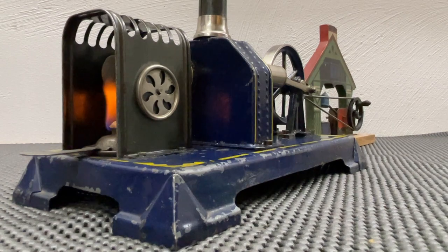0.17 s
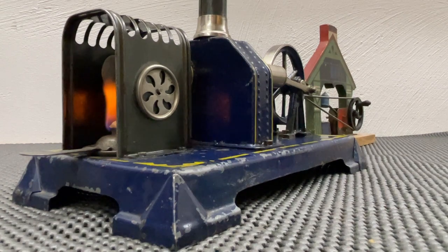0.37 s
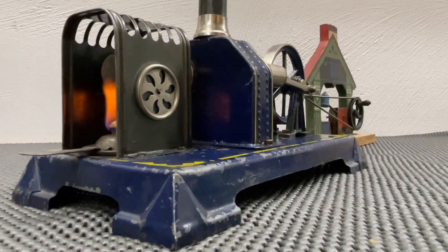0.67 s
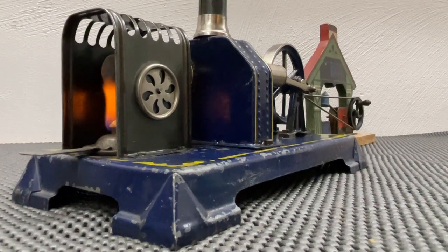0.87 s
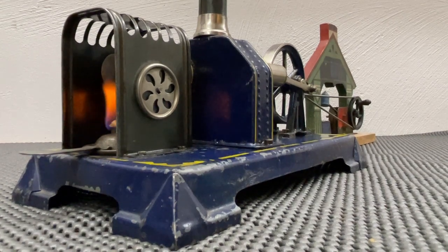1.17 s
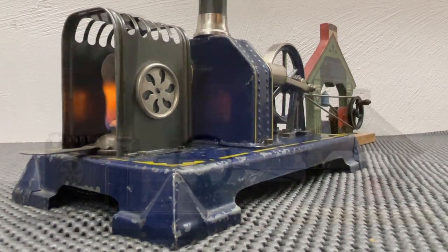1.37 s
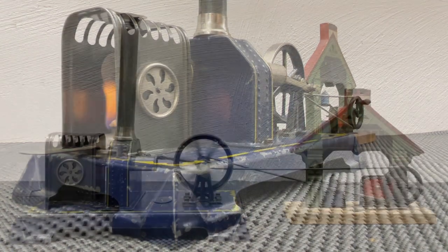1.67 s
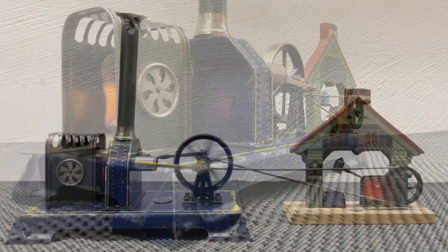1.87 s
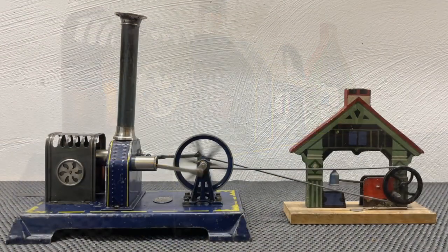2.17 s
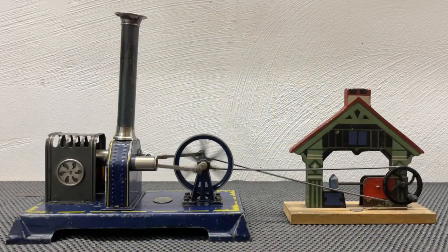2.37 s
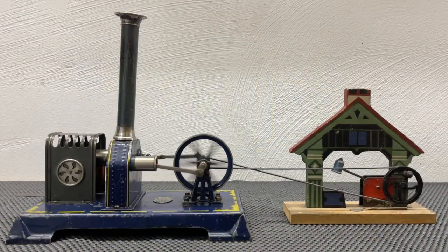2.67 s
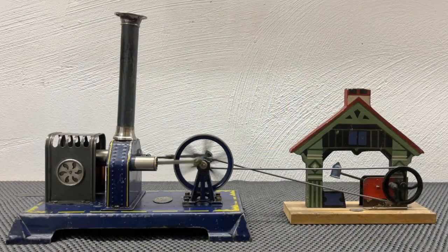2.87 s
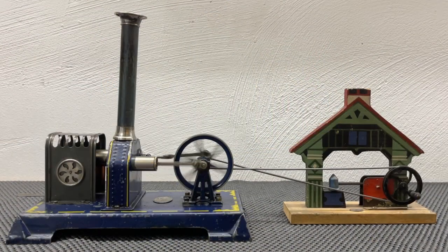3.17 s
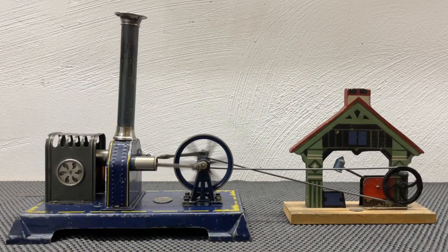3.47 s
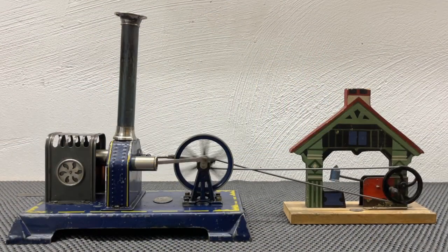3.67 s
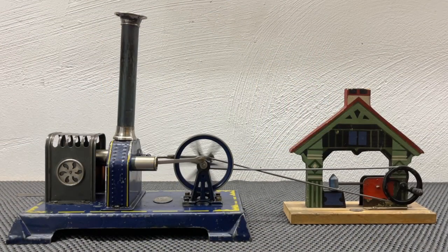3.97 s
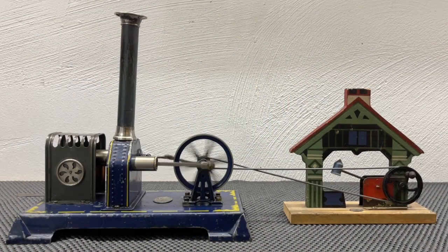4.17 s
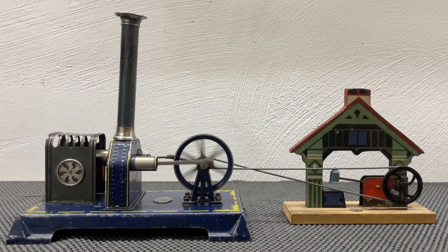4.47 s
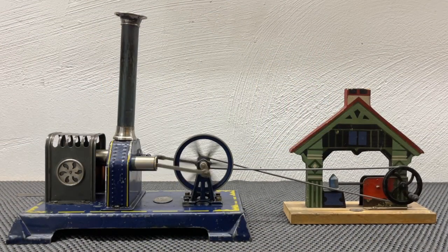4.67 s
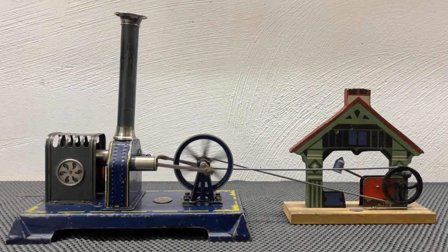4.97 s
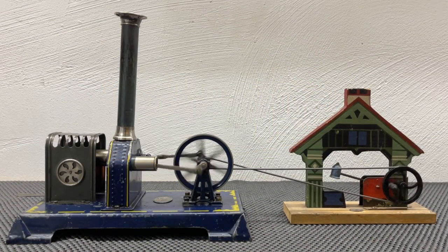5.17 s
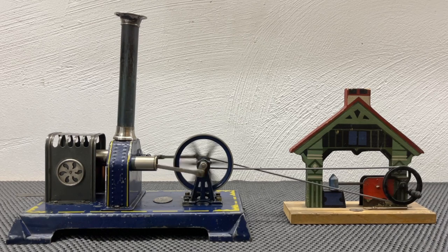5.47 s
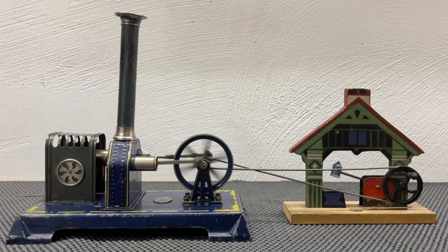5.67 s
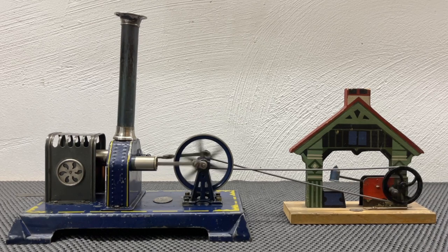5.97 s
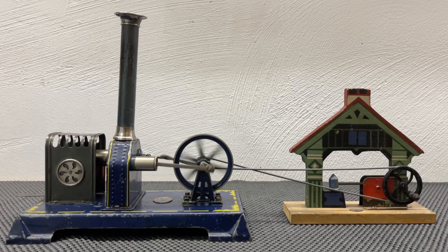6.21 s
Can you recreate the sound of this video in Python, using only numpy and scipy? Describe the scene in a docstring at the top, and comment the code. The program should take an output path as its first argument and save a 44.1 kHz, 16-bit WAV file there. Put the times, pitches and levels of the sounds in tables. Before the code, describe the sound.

A small flame hisses and flutters quietly, then fades into a toy engine's fast even metallic clatter, with a toy mill's hammer knocking regularly.

```python
"""A spirit flame is heard first, hissing and fluttering close by: bands of flickering noise with soft, dull puffs.
It fades over into a running tin toy hot-air engine on a table indoors, knocking twice a turn as its linkage
takes up play: each contact excites decaying modes of base plate, cylinder and linkage. Periodic pushes keep the
table humming, bearings and belt add noise, and a belt-driven toy mill to the right has a cam that lifts, rattles
and drops a small hammer, again modal, with rebounds. Feedback delays supply the room's reverberation."""
import sys
import numpy as np
from scipy import signal
from scipy.fft import rfft, irfft, next_fast_len
from scipy.io import wavfile

SR = 44100
rng = np.random.default_rng(int(sys.argv[2]) if len(sys.argv) > 2 else 0)


def put_to_file(sound):
    """Save the sound as 16-bit audio at rate SR, in the file named by the first command-line argument."""
    columns = np.atleast_2d(sound).T  # one column per channel
    safe = np.clip(columns, -1, 1)
    whole_steps = np.round(safe * 32767)
    wavfile.write(sys.argv[1], SR, whole_steps.astype(np.int16))


def volts_from_decibels(level):
    """Turn decibel levels (scalar or array-like) into linear amplitude factors."""
    exponent = np.asarray(level, float) / 20
    return 10 ** exponent


N = 279594


def rms_one(x):
    """Normalisation: scale a signal to unit root mean square."""
    return x / np.sqrt(np.mean(x ** 2) + 1e-20)


def in_time(rows):
    """Linear interpolation: a two-column curve read at every sample."""
    return np.interp(np.arange(N) / SR, *np.transpose(rows))


def at_hz(points, hz):
    """Interpolation on a logarithmic frequency axis."""
    points_hz, values = np.array(points).T
    return np.interp(np.log(hz), np.log(points_hz + 1), values)


def drift(rate_hz):
    """Low-pass filtered chance: a random fluctuation of spread 1, weaker above its corner rate."""
    step = 40   # samples between computed points
    r = np.exp(-2 * np.pi * rate_hz * step / SR)
    noise = rng.standard_normal(N // step + 2002)
    slow = signal.lfilter([1], [1, -2 * r, r * r], noise)[2000:]   # drop the filter's start
    return np.interp(np.arange(N) / step, np.arange(len(slow)), rms_one(slow))


def clicks(s, size):
    """Impulsive excitation: single-sample impulses of given sizes at given times."""
    at = np.round(np.ravel(s) * SR).astype(int)
    return np.bincount(at, np.ravel(size), N)[:N] + 1e-18


def ring(x, hz, t60):
    """Damped resonance: a unit click sets ringing a sine of initial height 1 that falls 60 dB in t60 seconds."""
    r, w = volts_from_decibels(-60 / (t60 * SR)), 2 * np.pi * hz / SR
    return signal.lfilter([0, np.sin(w)], [1, -2 * r * np.cos(w), r * r], x)


def struck(modes, s, db, spread_db, tilt_db=0):
    """Modal superposition: each blow excites every mode, with chance in level; tilt is in dB per octave."""
    middle_hz = np.median(modes, axis=0)[0]
    out = 0
    for k, (hz, mode_db, t60) in enumerate(modes):
        chance_db = spread_db * rng.standard_normal(np.shape(s))
        blow_db = db + mode_db + tilt_db * np.log2(hz / middle_hz) + chance_db
        # neighbouring modes start in opposite directions
        out = out + (-1) ** k * ring(clicks(s, volts_from_decibels(blow_db)), hz, t60)
    return out


def coloured(x, spectrum):
    """Linear filtering: multiply the spectrum of a signal by a gain curve."""
    size = next_fast_len(N + 4096)
    hz = np.arange(size // 2 + 1) * SR / size
    return irfft(rfft(x, size) * volts_from_decibels(at_hz(spectrum, hz + 1)), size)[:, :N]


def banded_noise(spectrum, likeness, balance, patchy_db):
    """Partial coherence: third-octave stereo noise, each band with flicker, likeness and balance; rms 1."""
    out, together = 0, drift(60)
    edges = 25 * 2 ** (np.arange(28) / 3)
    white = rng.standard_normal((2, 2, N))
    for k, (low, high) in enumerate(zip(edges, edges[1:])):
        band = signal.butter(2, [low, high], "band", fs=SR, output="sos")
        mid, side = signal.sosfilt(band, white[k % 2])
        hz = np.sqrt(low * high)
        alike = np.clip(at_hz(likeness, hz), -1, 1)
        lean = at_hz(balance, hz) / 2
        flicker = volts_from_decibels(patchy_db * (together + 0.91 * drift(10.8)))
        pair = np.sqrt(1 + alike) * mid + np.sqrt(1 - alike) * side * [[1], [-1]]
        out = out + flicker * volts_from_decibels([[lean], [-lean]]) * pair
    return rms_one(coloured(out, spectrum))


def room(x):
    """Reverberation by recirculation: eight feedback delays a side, very slightly duller on every round."""
    t60_s, wall_cut_hz = 0.3, 180000
    size = next_fast_len(N + SR)
    hz = np.arange(size // 2 + 1) * SR / size
    lag_s = rng.uniform(0.009, 0.019, (2, 8, 1))
    loop = volts_from_decibels(-60 * lag_s / t60_s) / (1 + 1j * hz / wall_cut_hz) * np.exp(-2j * np.pi * hz * lag_s)
    signs = (-1) ** np.arange(8)[:, None]
    response = (signs * loop / (1 - loop)).sum(axis=1)
    return irfft(rfft(x, size) * response, size)[:, :N]


# Level difference of the two microphone ports: f/Hz, left over right level/dB
PORT_DB = [(60, 2), (170, -1), (500, 1.5), (1460, 3.5), (4220, 5), (12200, 1)]
# Phase difference of the ports: f/Hz, lead of the left phase/rad
PORT_LEAD = [(0, 0), (780, 0.6), (1810, 0.1), (3270, 1.0), (3960, 0.4), (6120, 0.5), (6800, -0.0),
             (7240, 1.0), (7670, 1.0), (8790, -0.3), (9820, -2.8), (10900, -3.5), (11600, -6.3),
             (12400, -6.3)]


def ports(x):
    """Interchannel level and phase: two microphone ports share the direct sound's differences equally."""
    size = next_fast_len(N + 4096)
    hz = np.arange(size // 2 + 1) * SR / size
    phase = 0.5 * np.interp(hz, *np.transpose(PORT_LEAD))
    half = volts_from_decibels(at_hz(PORT_DB, hz + 1) / 2) * np.exp(1j * phase)
    return irfft(rfft(x, size) * [half, 1 / half], size)[:, :N]


# Noise of bearings and belt: f/Hz, relative spectral level/dB
RUNNING = [(40, -42), (55, -4.5), (283, -19), (530, -14.5), (650, -11), (890, -6.5), (1150, -10),
           (1430, -2.5), (1970, -11), (4660, -18), (9500, -19.5), (10300, -25.5), (12500, -59)]
# Its likeness between left and right: f/Hz, correlation/1
RUNNING_LIKENESS = [(60, 0.9), (170, 0.84), (500, 0.68), (1460, 0.21), (4220, 0.31), (12200, 0.28)]


def running_noise():
    """Broadband friction noise: bearings and belt as flickering bands of partly coherent noise."""
    return volts_from_decibels(-53) * banded_noise(RUNNING, RUNNING_LIKENESS, PORT_DB, patchy_db=3.0)


def table(out_s):
    """Periodically forced resonance: one push of the unbalanced flywheel a turn keeps the table top humming."""
    mode_hz, t60_s, after_s = 44.76, 3.3, 0.019
    s = out_s + after_s
    turn_s = s[1] - s[0]
    s = np.r_[s[0] - turn_s * np.arange(9, 0, -1), s]   # it was turning before it is heard
    pushes = clicks(s, volts_from_decibels(1.0 * rng.standard_normal(len(s))))
    hum = signal.lfilter([0.01], [1, -0.99], ring(pushes, mode_hz, t60_s))   # low-pass
    return volts_from_decibels(-62) * rms_one(hum)


# Course of the flame's hiss: t/s, relative level/dB
FLAME_LEVEL = [(0.0, -64.5), (0.164, -65.5), (0.658, -64.5), (1.038, -66.5), (1.45, -65)]
# Colour of the hiss: f/Hz, relative level/dB
FLAME_HISS = [(30, 2), (90, 1), (200, -7), (540, -7), (990, -5.5), (1300, -7.5), (1900, 0), (2450, -2),
              (3500, -16), (4600, -11.5), (6700, -20.5), (7900, -13), (8650, 6), (9500, -12.5),
              (11000, -3.5), (12600, 4)]
# Likeness of left and right: f/Hz, correlation/1
FLAME_LIKENESS = [(60, 0.53), (170, 0.54), (500, 0.68), (1460, 0.18), (4220, 0.046), (12200, 0.31)]
# Balance of the hiss: f/Hz, left over right level/dB
FLAME_BALANCE = [(60, 1), (170, -1), (500, 4), (1460, 5), (4220, 9.5), (12200, -1.5)]
# Soft puffs of the flame: t/s, relative level/dB, f/Hz
PUFFS = [(0.118, -60.5, 980), (0.244, -59, 794), (0.359, -63, 549), (0.658, -60, 428), (0.75, -52, 570),
         (0.884, -57, 940), (0.992, -59, 996), (1.219, -61, 477), (1.289, -66, 630)]


def flame():
    """Modulated noise and damped bursts: a fluttering hiss with soft puffs."""
    noise = banded_noise(FLAME_HISS, FLAME_LIKENESS, FLAME_BALANCE, patchy_db=1.5)
    out = volts_from_decibels(in_time(FLAME_LEVEL) + 5.5) * noise
    for s, db, hz in PUFFS:
        later_s = 0.00447 * rng.exponential(1, 8)   # a puff is eight clicks close together
        out = out + ring(clicks(s + later_s, np.full(8, volts_from_decibels(db - 6.5))), hz, 0.011)
    return out


# The cam catches the hammer arm, seats and drags it up, the pivot squeaking:
# t/s, relative catch level/dB, seat level/dB, squeak level/dB
CATCHES = [(1.746, -30, -38, -52), (2.519, -28.5, -31.5, -49.5), (3.2826, -30.5, -40, -79),
           (4.0443, -28, -33, -58), (4.815, -30.5, -37.5, -46.5), (5.5755, -28, -41, -51),
           (6.3344, -28.5, -40, -60)]
# Modes of the hammer arm: f/Hz, relative level/dB, t60/s
HAMMER_ARM = [(2260, 1, 0.029), (2427, 1, 0.024), (2637, 1.5, 0.027), (3000, -17, 0.022)]


def lifting():
    """Stick-slip friction: uneven clicks on the cam ring the hammer arm and shake the wooden stand."""
    lift_db, quiet_db, waver_db = -54, -74, 1.5   # while the arm is dragged up; at rest; chance
    rise_s, hold_s, fade_s = 0.13, 0.093, 0.32
    shape_s = np.cumsum([0, rise_s, hold_s, fade_s])
    shape_db = [quiet_db, lift_db, lift_db, quiet_db]
    t = np.arange(N) / SR
    lifts_db = np.max([np.interp(t - row[0], shape_s, shape_db) for row in CATCHES], axis=0)
    level = volts_from_decibels(lifts_db + waver_db * drift(5.5))
    s = rng.uniform(0, N / SR, 1100)
    click_db = 4.0 * np.minimum(rng.exponential(1, s.shape), 2.5)
    arm = rms_one(struck(HAMMER_ARM, s, click_db, spread_db=4.0))
    stand = rms_one(ring(rng.standard_normal(N), 108.9, 0.26))
    return level * (volts_from_decibels(-1.0) * arm + volts_from_decibels(-13.0) * stand)


# The hammer falls, the cam having tripped it just before: t/s, relative blow level/dB, trip level/dB
FALLS = [(1.4812, -24.5, -34), (2.257, -27.5, -30), (3.0182, -29.5, -32), (3.7778, -25.5, -35),
         (4.5505, -27.5, -29.5), (5.3138, -27.5, -34), (6.0737, -29.5, -41.5)]
# Kinds of mill blow: rebound relative level/dB, third rebound delay/ms, hardness/(dB per octave)
FALL = (-3, 8.0, -2.3)
TRIP = (-8, 7.5, 0.1)
CATCH = (-3, 8.0, -2)
SEAT = (-7.5, 9.1, -8)
# Rebounds of a blow: share of the third rebound's delay/1, relative level/dB
REBOUNDS = [(.4, -1.5), (0.699, -5.5), (1, -9.5), (1.4, -7.5), (1.699, -11)]
# Modes of the mill: f/Hz, relative level/dB, t60/s
MILL = [(1788, -2.5, 0.018), (2264, -1.5, 0.019), (2616, 2, 0.02), (3041, 1.5, 0.021), (3386, 1, 0.033),
        (3666, -6.5, 0.032), (5200, -16.5, 0.024)]


def mill():
    """Impact and rebound: blows excite the mill's modes, rebounds are brighter, and the pivot squeaks."""
    trip_ahead_s, seat_after_s, squeak_after_s, squeak_width_s = 0.1047, 0.07, 0.095, 0.044
    blows = []
    for s, db, trip_db in FALLS:
        blows += [(s, db, *FALL), (s - trip_ahead_s, trip_db, *TRIP)]
    for s, db, seat_db, _ in CATCHES:
        blows += [(s, db, *CATCH), (s + seat_after_s, seat_db, *SEAT)]
    s, db, rebound_db, delay_ms, tilt_db = np.transpose(blows)[:, :, None]
    share, fall_db = np.transpose(REBOUNDS)
    jitter_ms = 0.3 * rng.standard_normal((len(s), len(share)))
    later = s + (share * delay_ms + jitter_ms) / 1000
    out = struck(MILL, s, db - 11.0, spread_db=3.0, tilt_db=tilt_db)
    rebounds_db = db + rebound_db + fall_db - 11.0
    out += struck(MILL, later, rebounds_db, spread_db=5.5, tilt_db=tilt_db + 1.5)
    t = np.arange(N) / SR - squeak_after_s
    whistle = rms_one(ring(rng.standard_normal(N), 11200, 0.01))
    swell = sum(volts_from_decibels(db) * np.exp(-(2 * (t - s) / squeak_width_s - 1) ** 2) for s, _, _, db in CATCHES)
    return out + whistle * swell


# Modes of the linkage: f/Hz, relative level/dB, t60/s
LINKAGE = [(2120, -2, 0.014), (2437, -6, 0.026), (2756, -1.5, 0.013), (3166, 0, 0.014), (3510, -5, 0.02),
           (4020, -3.5, 0.018), (4260, -16.5, 0.14), (4370, -7, 0.038), (5083, -2, 0.0098),
           (5306, -4, 0.015), (5860, 1, 0.0086), (6160, -9, 0.035), (6610, -2.5, 0.013),
           (7244, -4.5, 0.025), (7750, -2.5, 0.019), (8250, -1.5, 0.014), (8840, -3.5, 0.015),
           (9150, 0.5, 0.012), (9860, 6.5, .012), (10950, -10, 0.0087)]


def loose_play():
    """Random impacts: loose pins tick at chance times all through the turn."""
    s = rng.uniform(0, N / SR, 1500)
    tick_db = -74.0 + 3.1 * np.minimum(rng.exponential(1, s.shape), 4)
    return struck(LINKAGE, s, tick_db, spread_db=5.0)


# Speed of the flywheel: t/s, rotation rate/(turns per s)
FLYWHEEL = [(1.4, 6.3789), (2, 6.3324), (3, 6.4221), (4, 6.3952), (6.4, 6.454)]
# Back strokes that meet the play early: t/s, looseness/1
LOOSE = [(2.749, 1.01), (3.528, 1.01), (3.684, 0.45), (4.153, 0.96), (4.62, 0.5), (5.4, 0.66), (5.867, 0.7)]
# What full looseness adds: knock level/dB, tick level/dB, slack level/dB
LOOSE_DB = (-3.5, -2.5, 8)


def strokes(first_turn, shared_db):
    """Rotation integrated to phase: time, knock, tick and slack of the strokes at one crank angle, one a turn."""
    # chance in, and steady change of, knock, tick and slack: the knocks firm up as the engine runs
    spread_db, warming_db_per_s = (0.71, 1.2, 0.9), (0.33, -0.35, 0.5)
    jitter_ms, loose_late_ms = 0.3, 0.7
    t = np.arange(N) / SR
    turns = np.cumsum(in_time(FLYWHEEL) * (t >= FLYWHEEL[0][0])) / SR
    s = np.interp(np.arange(first_turn, turns[-1]), turns, t)
    loose = sum(share * (abs(s - when) < 0.02) for when, share in LOOSE)
    chance = rng.standard_normal((len(s), 4))
    db = shared_db + np.outer(s - s.mean(), warming_db_per_s) + np.outer(loose, LOOSE_DB)
    db = db + chance[:, 1:] * spread_db
    late_ms = loose_late_ms * loose + jitter_ms * chance[:, 0]
    return np.c_[s + late_ms / 1000, db]


# Contacts within a back and an out stroke: t after the knock/ms, relative base plate level/dB,
# hardness/(dB per octave), cylinder level/dB, linkage level/dB, rub time/ms
BACK_CONTACTS = [(-20, -41, 3, -27, -2.5, 12), (-12, -11, 17.5, -24, 1.5, 1.2), (-6, -19, -5, -14, 7, 1.1),
                 (-1.72, -10, 0.5, -14, 1.5, 1.4), (0.5, -4.5, 9, 0.5, 0, 1.6)]
OUT_CONTACTS = [(-25, -6, -4, -9, -7, 3), (-16, -11, -6.5, -27, -16, 2), (-3.5, -11.5, 15, -20, 2, .9),
                (-0.43, -7, 18.5, -2.5, 2.5, 1.1), (1, -6, 15, -4, -5, 3.0), (5.5, -12, -5, -38, -9.5, 1.7)]
# Modes of base plate and cylinder: f/Hz, relative level/dB, t60/s
BASE_PLATE = [(162, -22.5, 0.054), (414, -18, 0.067), (639, -2.5, 0.035), (758, -4, 0.028),
              (892.5, -2, 0.029), (1045.4, -13, 0.11)]
CYLINDER = [(1354, -0.5, 0.017), (1547, 1, 0.021), (1272, -25, 0.11), (1460, -30.5, 0.18),
            (1603, -37, 0.26)]


def engine(back, out):
    """Modal response to multiple impacts: the contacts of each stroke play base plate, cylinder and linkage."""
    firebox_hz, firebox_width_hz = 1555, 1100   # the air that the cylinder sounds through
    base, cylinder, linkage = 0, 0, 0
    for rows, contacts in ((back, BACK_CONTACTS), (out, OUT_CONTACTS)):
        s, knock_db, tick_db, slack_db = np.transpose(rows)[:, :, None]
        ms, base_db, tilt_db, cylinder_db, linkage_db, rub_ms = np.transpose(contacts)
        early = ms < -5   # slack taken up ahead of the knock
        jitter_ms = 0.35 * early * rng.standard_normal((len(s), len(ms)))
        at = s + (ms + jitter_ms) / 1000
        db = knock_db + slack_db * early
        base = base + struck(BASE_PLATE, at, db + base_db - 7.0, spread_db=1.46, tilt_db=tilt_db)
        # metal chatters on metal: a contact is a run of tiny touches thinning out over the rub time
        touches = at[:, :, None] + rub_ms[:, None] / 1000 * rng.exponential(1, at.shape + (6,))
        # slack is taken up in three nudges; the later contacts strike the cylinder at one instant
        nudges = np.where(early[:, None], touches, at[:, :, None])[:, :, :3]
        # two close modes start in opposition: the knock swells, then cancels
        nudge_db = (db + cylinder_db + 3.8 * early)[:, :, None] - 9.5
        cylinder = cylinder + struck(CYLINDER, nudges, nudge_db, spread_db=2.0)
        touch_db = (db + tick_db + linkage_db)[:, :, None] - 13.5
        linkage = linkage + struck(LINKAGE, touches, touch_db, spread_db=4.0)
    edges = firebox_hz + np.array([-0.5, 0.5]) * firebox_width_hz
    return base + linkage + signal.lfilter(*signal.butter(1, edges, "band", fs=SR), cylinder)


# What every stroke of a kind shares: relative knock level/dB, tick level over the knock/dB,
# level of slack taken up ahead/dB
BACK_STROKE = (-30, -17, -2.55)
OUT_STROKE = (-32.5, -8.5, -0.38)


def scene():
    """Superposition of direct and reverberant sound: flame, then engine, table and, to the right, the mill."""
    back_at, out_at = 0.5749, 1.078   # first strokes, in turns after the first flywheel row
    # the flame gives way to the running engine between these times
    fade = np.interp(np.arange(N) / SR, (1.446, 2.16), [0, 1])
    back, out = strokes(back_at, BACK_STROKE), strokes(out_at, OUT_STROKE)
    engine_sound = fade * (engine(back, out) + loose_play())
    mill_sound = fade * (mill() + lifting())
    direct = ports(engine_sound) + ports(mill_sound) * volts_from_decibels([[-1.5], [1.5]])
    reverberant = volts_from_decibels(-24) * room(engine_sound + mill_sound)
    hum = fade ** 2.5 * table(out[:, 0])
    return direct + reverberant + fade * running_noise() + hum + (1 - fade) * flame()


def band_limit(x):
    """A steep low-pass at the top of the band."""
    return signal.sosfilt(signal.butter(12, 12810, fs=SR, output="sos"), x)


# Response of the microphone: f/Hz, level/dB
MICROPHONE = [(28, -16), (38, -1.5), (9500, 0.5), (10300, -9), (10900, 1), (11500, -11.5), (12300, -10.5),
              (13000, -20)]


def record(dry):
    """Transducer frequency response: a small microphone with dips near the top colours the mix."""
    mix = coloured(dry, MICROPHONE)
    return band_limit(mix)


dry = scene()
out = record(dry)
put_to_file(out)
```